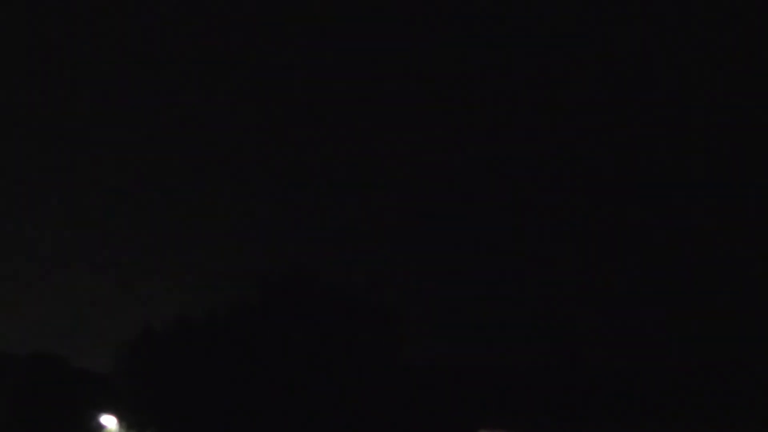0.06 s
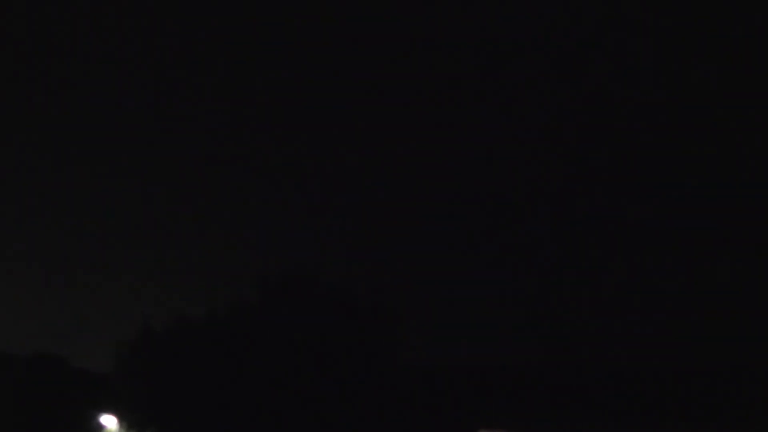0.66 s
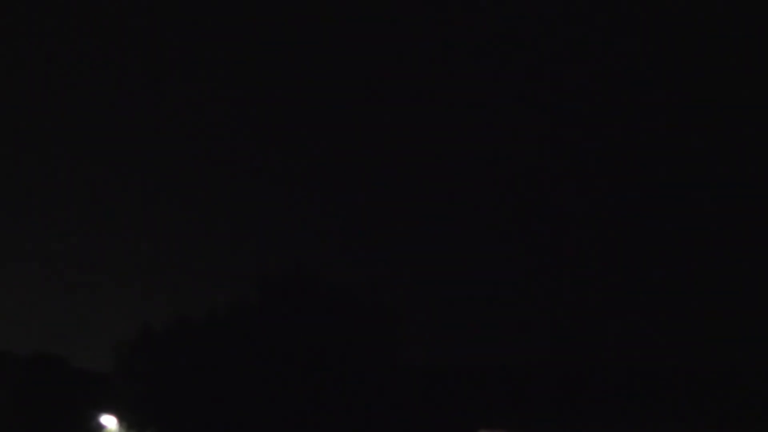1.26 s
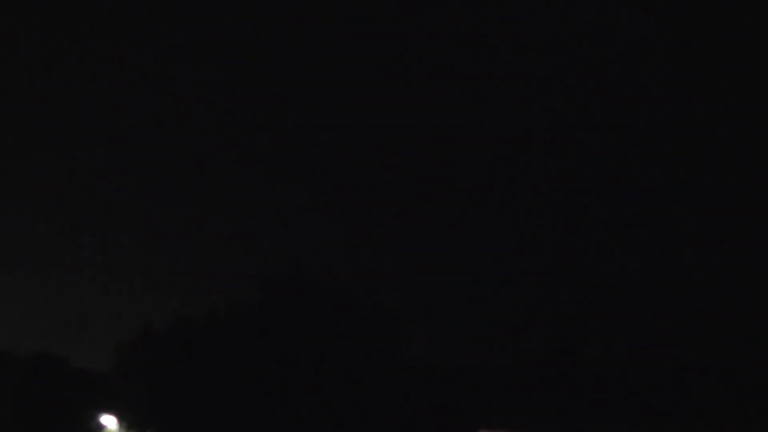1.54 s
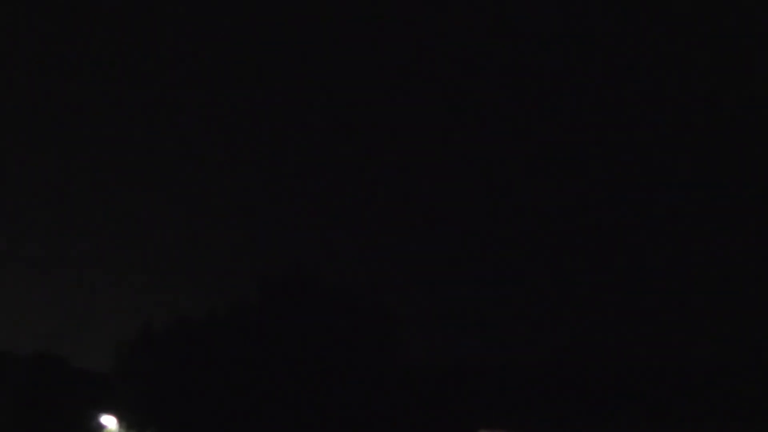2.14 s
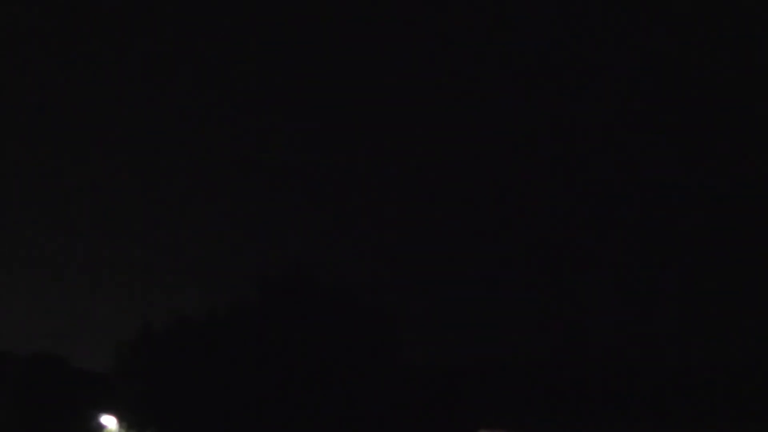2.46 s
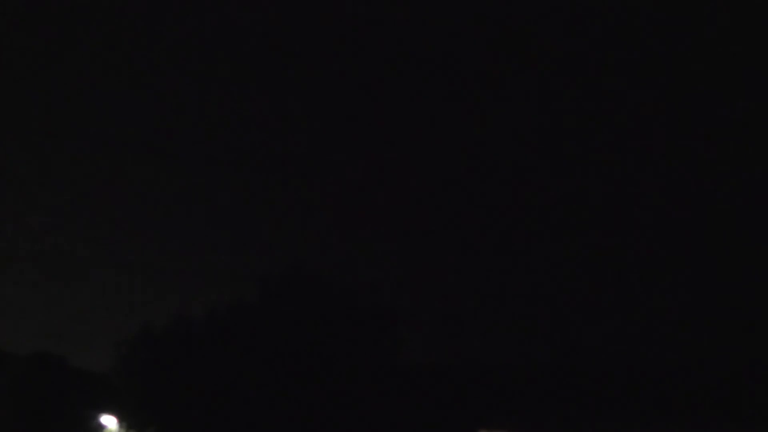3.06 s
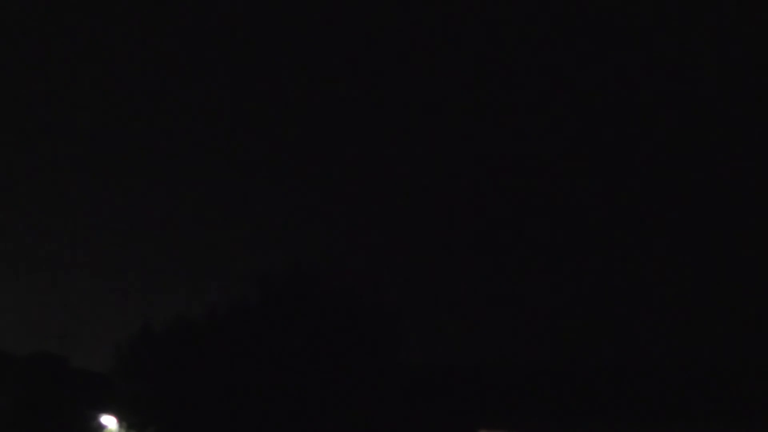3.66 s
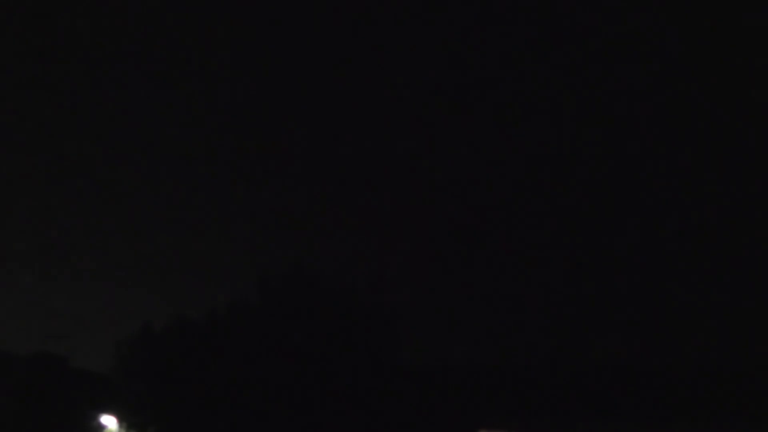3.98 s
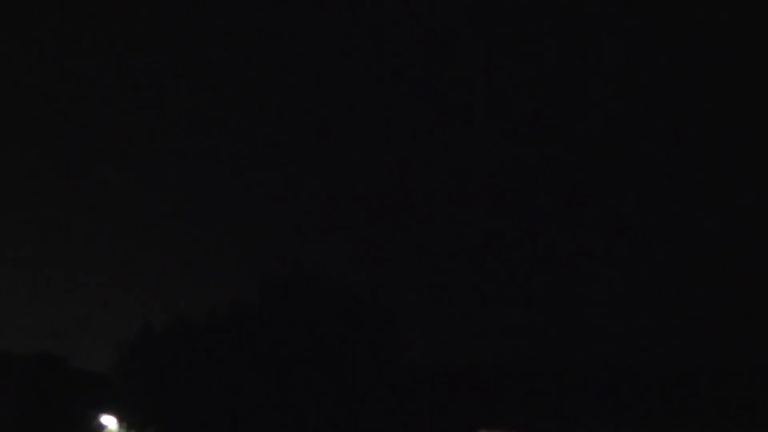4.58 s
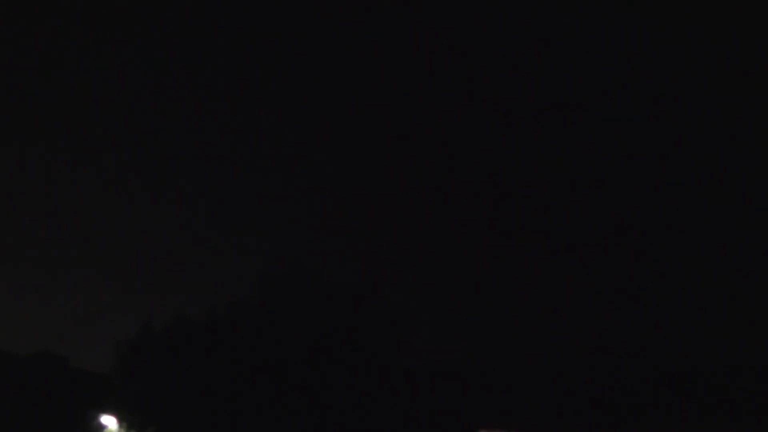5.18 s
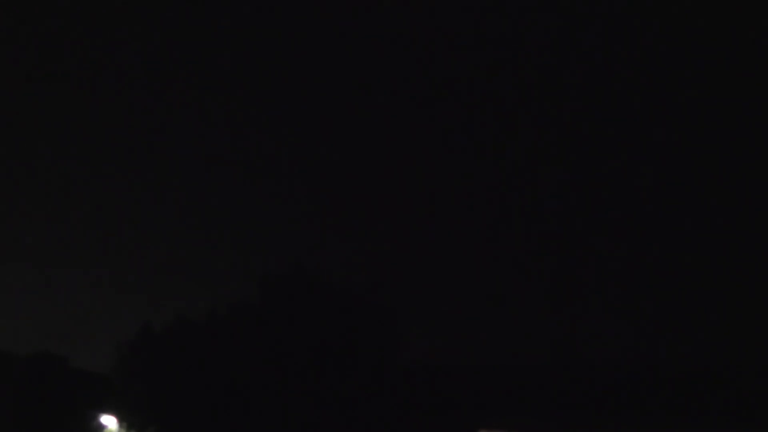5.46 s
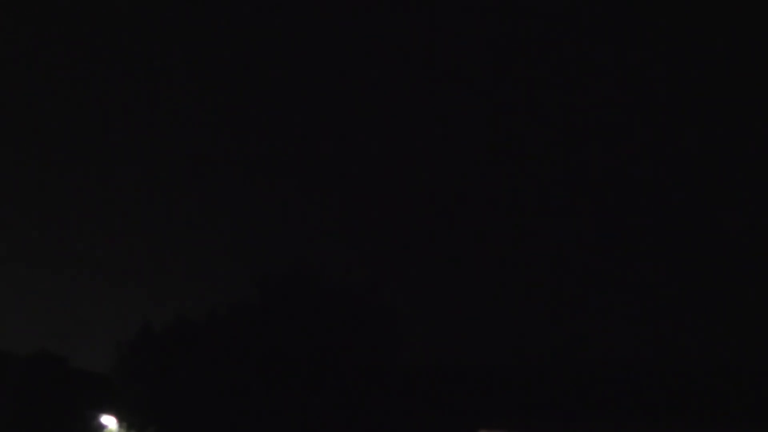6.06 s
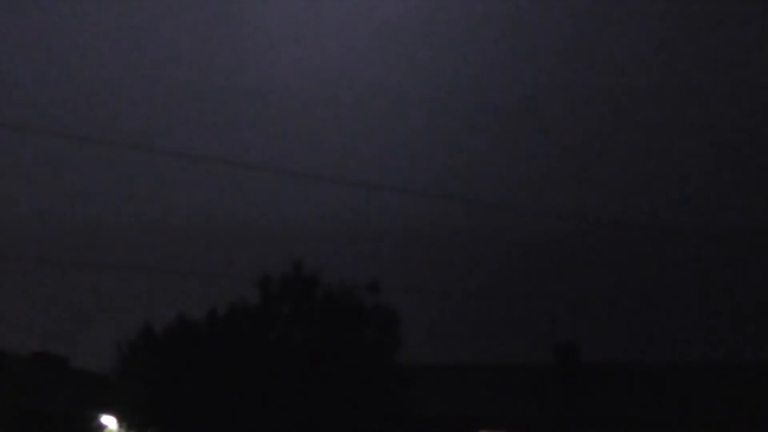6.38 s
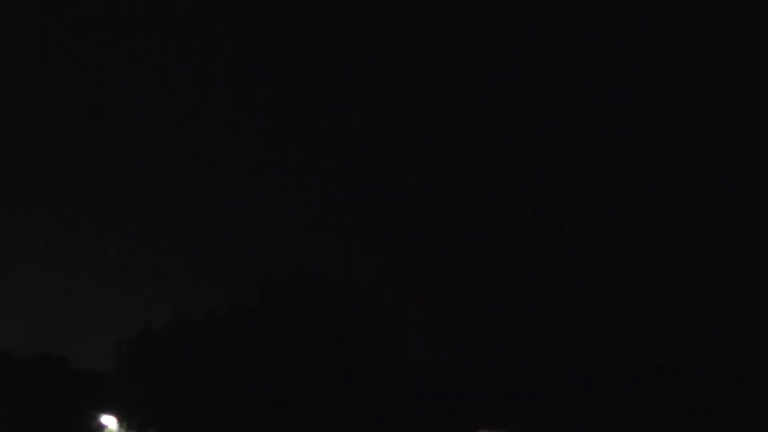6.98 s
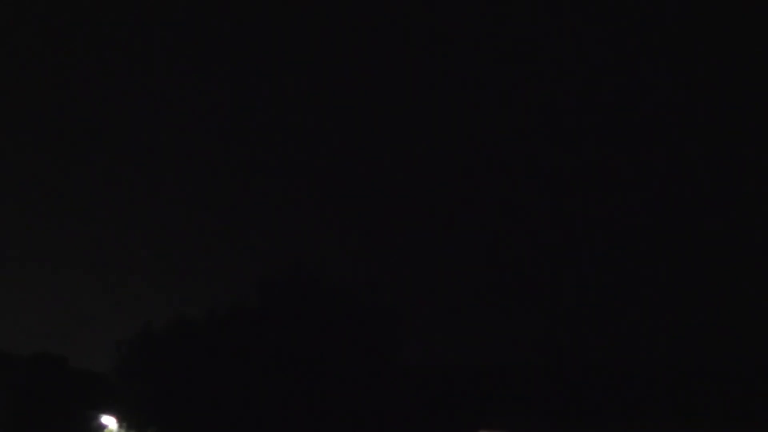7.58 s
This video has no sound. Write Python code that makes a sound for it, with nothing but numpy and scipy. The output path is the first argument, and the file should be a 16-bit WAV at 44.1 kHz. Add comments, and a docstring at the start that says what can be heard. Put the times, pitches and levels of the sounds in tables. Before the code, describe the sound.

A tearing thunder crack opens a long, deep rumble that dips and builds back into booming claps, over a soft sleeve rustle.

```python
"""Thunder on a still night: a tearing crack, then a deep roll that eases and swells again in heavy claps.
Each kink of a long crooked lightning channel sends a shock wave: long waves boom and roll, short ones
tear, steep fronts crackle. Broadside stretches arrive at once as claps. Nearby surfaces colour the thunder.
Close by are a rustling sleeve, tiny squeaks, a stick-slip creak and a faint hiss."""
import sys
import numpy as np
from scipy import signal
from scipy.fft import rfft, irfft, next_fast_len
from scipy.io import wavfile
from scipy.ndimage import uniform_filter1d, minimum_filter1d

SR = 44100
rng = np.random.default_rng(int(sys.argv[2]) if len(sys.argv) > 2 else 0)


def waveform_to_disk(signal):
    """Save audio, clipped to [-1, 1], as 16-bit WAV at the path in sys.argv[1]."""
    frames = np.transpose(np.atleast_2d(signal))
    scaled = np.clip(frames, -1, 1) * 32767
    samples = np.round(scaled).astype(np.int16)
    wavfile.write(sys.argv[1], SR, samples)


N = 345290

# Unbroken roll from the far channel. Each row: time in s, roll level in dB, tearing level in dB.
FAR_ROLL = [(0, -21, -26.5), (.2, -18, -23.5), (.5, -24, -21), (.75, -19.5, -24), (1.0, -19.5, -28.5),
            (1.5, -22.5, -26.5), (1.98, -29, -33.5), (2.41, -28, -32), (2.62, -20, -25.5), (3.33, -18, -29),
            (3.6, -25.5, -31.5), (3.87, -24, -32), (4.17, -16, -23.5), (4.88, -20, -28.5),
            (5.75, -18, -28.5), (5.95, -16, -25), (6.76, -23.5, -31.5), (7.22, -22, -31),
            (7.48, -27, -35.5), (7.83, -25.5, -35)]
# One peal per branch. Each row: start in s, roll level in dB, tearing level in dB, length in s.
PEALS = [(0.221, -16.5, -21, 0.11), (0.341, -19, -16, 0.07), (0.544, -20.5, -17, 0.048),
         (0.615, -14, -30.5, 0.052), (.836, -15.5, -23.5, 0.038), (0.975, -19.5, -26, 0.05),
         (1.16, -23, -34.5, 0.045), (1.303, -22.5, -28.5, 0.093), (1.83, -30.5, -30, 0.072),
         (2.023, -29.5, -28.5, 0.082), (2.125, -27.5, -26.5, 0.11), (2.664, -21.5, -23, 0.051),
         (2.884, -14, -23, 0.059), (3.122, -16, -22.5, 0.068), (3.327, -17.5, -25, 0.051),
         (3.989, -10.5, -21, 0.073), (4.09, -15, -29, 0.12), (4.357, -11.5, -25.5, 0.086),
         (4.547, -17, -32.5, 0.13), (4.739, -18.5, -25, 0.038), (4.905, -9, -22.5, 0.061),
         (4.993, -8.5, -21, 0.055), (5.278, -20, -21, 0.033), (5.365, -13.5, -28, 0.045),
         (5.513, -12.5, -22, .08), (5.979, -8, -19, 0.054), (6.058, -10.5, -19, 0.059),
         (6.262, -22, -26.5, 0.068), (6.532, -17, -30, 0.085), (6.903, -16, -32, 0.045),
         (7.036, -21.5, -32.5, 0.13), (7.267, -15.5, -27.5, 0.041), (7.789, -6, -25.5, .06)]
def peals(attack_s=0.046, t60_s=0.22):
    """Roll and tearing envelopes: each branch's peal adds its power to the unbroken roll."""
    t = np.arange(N) / SR
    power = amp(curves(FAR_ROLL)) ** 2
    for start_s, roll_db, tear_db, length_s in PEALS:
        swell = np.clip((t - start_s) / attack_s, 0, 1)
        fade = amp(-60 * np.maximum(t - start_s - length_s, 0) / t60_s)
        power += np.outer(amp([roll_db, tear_db]), swell * fade) ** 2
    return np.sqrt(power)


# Longest waves, from the main channel. Each row: time in s, gain on the roll envelope in dB.
BOOM_SHARE = [(0, -15.5), (.9, -20.5), (1.4, -10.5), (2.4, -13.5), (3.2, -9.5), (3.8, -9), (4.25, -1),
              (4.45, -5.5), (4.7, -4), (5.0, -10.5), (5.6, -6.5), (7.3, -10.5), (7.8, -15.5)]
# Steep fronts; more air blunts the late ones. Each row: time in s, gain on the tearing envelope in dB.
FRONT_SHARE = [(0, -22), (4.1, -19.5), (5.7, -25), (7.4, -27.5)]
# Shock spectra, longest waves to steepest. Each row: frequency in Hz, relative density in dB.
BOOM_SPECTRUM = [(20, -52.5), (32, -28.5), (43, -12), (68, -17), (85, -7), (105, 5.5), (150, -0.5),
                 (190, -17.5), (400, -65), (1000, -120)]
ROLL_SPECTRUM = [(22, -55.5), (42, -27.5), (72, -31), (100, -12.5), (130, -4.5), (190, 2), (250, -0.5),
                 (345, -3), (400, -19), (520, -27), (900, -56), (2000, -120)]
TEAR_SPECTRUM = [(150, -40), (320, 1.5), (430, -2), (620, 2), (770, -0.5), (880, -4.5), (990, -12.5),
                 (1270, -11), (1500, -28), (2200, -55), (4000, -120)]
FRONT_SPECTRUM = [(700, -53), (1100, -10), (1350, 0.5), (1550, -6.5), (1850, -10.5), (2200, -21.5),
                  (2700, -33), (3600, -46.5), (6000, -64.5), (12000, -100)]
def rumble(boom_db=-0.5, roll_db=-1.84, tear_db=-1.8, steepen_ref_db=-26.5, steepen_db_per_db=0.18):
    """Shocks from the channel's kinks: long ones boom and roll, short ones tear, steep ones crackle."""
    deep, tearing = peals()
    front_share_db, = curves(FRONT_SHARE)
    boom_share_db, = curves(BOOM_SHARE)
    steepness = (tearing / amp(steepen_ref_db)) ** steepen_db_per_db  # strong shocks steepen
    boom = deep * shocks(BOOM_SPECTRUM, rate_hz=600, scatter_db=2.5, steady_s=0.095)
    roll = deep * shocks(ROLL_SPECTRUM, rate_hz=1200, scatter_db=3, steady_s=0.06)
    tear = tearing * shocks(TEAR_SPECTRUM, rate_hz=2800, scatter_db=4, steady_s=0.066)
    fronts = tearing * steepness * shocks(FRONT_SPECTRUM, rate_hz=3000, scatter_db=4.5, steady_s=0.1)
    return (amp(boom_db + boom_share_db) * boom + amp(roll_db) * roll
            + amp(tear_db) * tear + amp(front_share_db) * fronts)


# Single strong shocks. Each row: start in s, relative level in dB.
CLAPS = [(.282, -7.5), (.607, -14), (0.66, -13), (1.351, -14), (2.933, -5.5), (2.988, -10), (3.150, -6),
         (3.173, -9), (3.381, -10.5), (4.028, -5.5), (4.048, -7.5), (4.171, -5), (4.404, -6.5),
         (4.427, -8.5), (4.627, -7.5), (4.944, -4), (4.962, -2.5), (5.039, -6), (5.564, -6), (5.592, -6.5),
         (6.007, -7), (6.113, -2.5), (6.424, -13), (6.581, -11), (7.312, -12)]
# Clap colour. Each row: frequency in Hz, gain in dB.
CLAP_FILTER = [(22, -44.5), (45, -16.5), (70, -16.5), (105, -2), (200, 4.5), (330, -0.5), (420, -8),
               (750, -6), (1000, -17.5), (1350, -20), (2000, -32), (2800, -48.5), (6000, -65.5),
               (14000, -85)]
def claps(echo_db=-9, echo_t60_s=0.15, longest_s=0.006, trim_db=0.5):
    """Broadside stretches of channel arrive at once as an N-wave, then scatter off the land."""
    t = np.arange(SR // 4) / SR
    out = np.zeros((2, N + SR))
    for start_s, level_db in CLAPS:
        length_s = longest_s * amp(level_db) ** 0.35  # stronger shocks stretch longer
        n_wave = (1 - 2 * t / length_s) * (t < length_s)
        paths = amp(-60 * t / echo_t60_s) * rng.standard_normal((2, len(t)))
        paths *= amp(echo_db) / np.linalg.norm(paths[0])
        paths[0, 0] = 1  # direct path
        clap = signal.fftconvolve(paths, n_wave[None], axes=1)
        out[:, round(start_s * SR):][:, :clap.shape[1]] += amp(level_db + trim_db) * clap
    return coloured(out[:, :N], outdoors(CLAP_FILTER))


# Volleys of steep fronts. Each row: centre in s, level in dB, half length in s.
CRACKS = [(0.305, -42.5, 0.05), (0.397, -43, .035), (0.585, -42.5, .025), (2.19, -47, .03),
          (2.947, -38, 0.0147), (3.18, -37.5, 0.0187), (4.046, -33, 0.022), (4.436, -34.5, 0.012),
          (4.968, -34.5, 0.0064), (5.039, -42, 0.0083), (5.321, -44.5, .011), (5.595, -39, .014),
          (6.095, -40, .04)]
# Each row: frequency in Hz, relative density in dB.
CRACK_SPECTRUM = [(300, -20), (700, 5), (1000, 0.5), (1300, 3.5), (1900, -7.5), (2400, -19.5), (3200, -25),
                  (4500, -35), (8000, -52.5), (15000, -69.5)]
def cracks():
    """Where a bend of the channel faces the listener, steep fronts bunch into a short volley."""
    volleys = sum(amp(level_db) * gaussian(centre_s, half_s) for centre_s, level_db, half_s in CRACKS)
    return volleys * shocks(CRACK_SPECTRUM, rate_hz=350, scatter_db=3.5, steady_s=0.03)


# Each row: start in s, level in dB.
OVERLOAD_CLICKS = [(4.038, -49.5), (4.049, -54.5), (4.965, -52)]
def overload_clicks(t60_s=0.018):
    """Thin bright clicks as the microphone briefly overloads on loud claps."""
    t = np.arange(N) / SR
    envelope = sum(amp(level_db - 60 * np.abs(t - start_s) / t60_s) * (t >= start_s)
                   for start_s, level_db in OVERLOAD_CLICKS)
    return envelope * treble_noise()


# Sleeve strokes. Each row: start in s, level in dB, rise in s, T60 in s, airy treble shelf in dB.
SLEEVE_STROKES = [(.222, -54, .012, 0.07, -3), (.455, -48.5, .05, .39, 5.5), (.88, -52, .071, 0.64, 8),
                  (1.035, -49.5, .04, 0.23, 4.5), (1.31, -54.5, .003, .2, -4.5),
                  (1.485, -61.5, .01, 0.4, 2), (1.80, -61, .015, 0.1, 4), (2.573, -49.5, .004, 0.16, -4),
                  (2.611, -52, .01, .56, 1), (2.676, -41, .006, .15, 3), (3.42, -54.5, .005, .17, -9),
                  (3.611, -49.5, .004, .2, -3), (3.662, -51, .005, 0.66, -4.5),
                  (3.715, -48, 0.0086, 0.4, -7), (4.24, -60, .02, .6, 2), (4.517, -48.5, .004, 0.26, -3.5),
                  (4.73, -58, 0.0017, .85, -3.5), (5.533, -58.5, .001, 0.5, 1),
                  (6.621, -62.5, 0.0012, .15, -3.5)]
# Each row: frequency in Hz, relative density in dB.
SLEEVE_SPECTRUM = [(900, -30.5), (2200, -4), (3500, 1), (5500, 1.5), (7500, -3), (10000, -10.5),
                   (13000, -15), (16000, -23.5)]
def sleeve(grain_db=1.5, airy_hz=8500):
    """Cloth rubs in short grainy strokes, some airy, some dull."""
    t = np.arange(SR // 2) / SR
    out = np.zeros((2, N + SR))
    for start_s, level_db, rise_s, t60_s, airy_db in SLEEVE_STROKES:
        def colour_db(hz):
            return along(SLEEVE_SPECTRUM, hz) + airy_db * hz ** 4 / (hz ** 4 + airy_hz ** 4)
        rub = coloured(rng.standard_normal((2, len(t))), colour_db)
        grain = unit(uniform_filter1d(rng.standard_normal(len(t)), size=100))
        stroke = amp(level_db - 60 * t / t60_s) * (1 - np.exp(-t / rise_s))
        out[:, round(start_s * SR):][:, :len(t)] += stroke * unit(amp(grain_db * grain) * rub)
    return out[:, :N]


# Start of each slip in s.
CREAK_SLIPS_S = [7.607, 7.652, 7.696, 7.733, 7.764, 7.795]
# Each row: frequency in Hz, level in dB, T60 in s.
CREAK_MODES = [(563, -28, 0.15), (1530, -42.5, 0.057), (1870, -56, 0.04)]
def creak(rise_s=0.0021, detune=0.036):
    """Something nearby sticks and slips ever faster; each slip rings a few dull modes."""
    t = np.arange(SR // 8) / SR
    out = np.zeros(N + SR)
    for start_s in CREAK_SLIPS_S:
        ring = sum(amp(level_db - 60 * t / t60_s) * np.sin(2 * np.pi * hz * rng.normal(1, detune) * t)
                   for hz, level_db, t60_s in CREAK_MODES)
        out[round(start_s * SR):][:len(t)] += ring * (1 - np.exp(-t / rise_s))
    return out[:N]


# Each row: centre in s, pitch in Hz, level in dB, half length in s.
SQUEAKS = [(3.077, 3830, -70, .09), (3.363, 4050, -57, .005), (4.764, 3730, -61.5, 0.11),
           (5.392, 6230, -59, 0.011), (5.49, 5250, -68, 0.065)]
def squeaks(width_hz=330):
    """Faint narrow bands of noise swell and fade."""
    t = np.arange(N) / SR
    lowpass = signal.butter(2, width_hz / 2, fs=SR, output="sos")
    waver = unit(signal.sosfilt(lowpass, rng.standard_normal(N)))
    tones = sum(amp(level_db) * gaussian(centre_s, half_s) * np.sqrt(2) * np.sin(2 * np.pi * hz * t)
                for centre_s, hz, level_db, half_s in SQUEAKS)
    return waver * tones


# Each row: time in s, relative level in dB.
HISS_LEVELS = [(0.0, -72), (0.62, -66), (1.2, -72.5), (1.75, -69), (2.08, -61.5), (2.55, -66), (3.2, -68),
               (3.9, -63), (4.47, -67), (4.72, -63.5), (5.08, -69.5), (5.49, -65), (6.9, -71), (7.5, -70),
               (7.8, -64)]
def hiss(trim_db=1.0):
    """A faint hiss drifts in level."""
    level_db, = curves(HISS_LEVELS)
    return amp(level_db + trim_db) * treble_noise()


# Hiss and click colour. Each row: frequency in Hz, relative density in dB.
TREBLE_SPECTRUM = [(800, -19), (2500, -4.5), (3600, 1), (5000, 0.5), (6500, -3), (9000, -6), (12000, -8.5),
                   (15500, -14.5)]
def treble_noise():
    """Two independent bright noises of rms 1."""
    return unit(coloured(rng.standard_normal((2, N)), lambda hz: along(TREBLE_SPECTRUM, hz)))


def shocks(spectrum, rate_hz, scatter_db, steady_s):
    """Two hails of shocks of random size and sign, steady in power over spans beyond steady_s."""
    count = int(rate_hz * N / SR)
    arrivals = (rng.random((count, 2)).T * N).astype(int)
    scatter = np.clip(rng.standard_normal((count, 2)).T, -2, 2)
    sizes = amp(scatter_db * scatter) * rng.choice([-1, 1], scatter.shape)
    impulses = np.array([np.bincount(at, size, N) for at, size in zip(arrivals, sizes)])
    hail = coloured(impulses, outdoors(spectrum))
    span = max(int(steady_s * SR), 2)
    power = uniform_filter1d(uniform_filter1d(hail ** 2, span), span)
    return hail / np.sqrt(np.abs(power) + 1e-12)


# Each row: centre in Hz, width in Hz, gain in dB.
SURFACE_BANDS = [(150, 7.4, 7), (164, 23, -3.5), (186.6, 12, 7.5), (207.8, 11, -4), (234.6, 19, 3),
                 (275.1, 14, 6.5), (294.4, 22, -6), (322.8, 26, 5), (514.4, 10, 5), (537, 14, -5),
                 (624.4, 11, 3.5), (748, 34, 5.5), (865, 11, 4.5), (1064, 13, 4.5), (1193, 26, 3)]
def outdoors(spectrum):
    """Gain curve in dB: a spectrum plus the peaks and dips that nearby surfaces add."""
    return lambda hz: along(spectrum, hz) + sum(gain_db / (1 + (2 * (hz - centre_hz) / width_hz) ** 2)
                                                for centre_hz, width_hz, gain_db in SURFACE_BANDS)


# Each row: frequency in Hz, side gain in dB.
STEREO_WIDTH = [(60, -29.5), (125, -26), (250, -21), (700, -15.5), (1300, -10), (2500, -7), (9000, -6.5)]
def stereo(mid_side):
    """Two close microphones: the bass is alike in both, the treble less so."""
    mid, side = mid_side
    side = coloured(side, lambda hz: along(STEREO_WIDTH, hz))
    return np.array([mid + side, mid - side])


def coloured(x, gain_db):
    """Minimum-phase filter with response gain_db(hz)."""
    half = next_fast_len(x.shape[-1] // 2 + SR // 10)
    hz = np.fft.rfftfreq(2 * half, 1 / SR)
    cepstrum = irfft(np.log(amp(gain_db(hz)) + 1e-6))
    cepstrum[1:half] *= 2
    cepstrum[half + 1:] = 0
    return irfft(rfft(x, 2 * half) * np.exp(rfft(cepstrum)))[..., :x.shape[-1]]


def along(points, hz):
    """Interpolate (Hz, value) rows on a log axis."""
    knots_hz, values = np.transpose(points)
    return np.interp(np.log(hz + 1), np.log(knots_hz + 1), values)


def curves(rows):
    """One value per sample for each column after the time."""
    times_s, *columns = np.transpose(rows)
    return [np.interp(np.arange(N) / SR, times_s, column) for column in columns]


def gaussian(centre_s, half_s):
    """Bell envelope, 1/e at half_s from the centre."""
    t = np.arange(N) / SR
    return np.exp(-np.minimum(((t - centre_s) / half_s) ** 2, 50))


def amp(db):
    """Decibels to gain."""
    return 10 ** (np.asarray(db) / 20)


def unit(x):
    """Scale to rms 1."""
    return x / np.sqrt(np.mean(x ** 2) + 1e-20)


def scene():
    """Thunder over small close sounds and a faint hiss."""
    thunder = rumble() + cracks() + claps()
    return stereo(thunder + overload_clicks() + sleeve() + hiss()) + squeaks() + creak()


def record(dry, ceiling=0.96, top_hz=15700):
    """A limiter eases the highest peaks down; everything above top_hz is cut."""
    needed_gain = np.minimum(1, ceiling / (np.abs(dry).max(axis=0) + 1e-9))
    held_gain = minimum_filter1d(needed_gain, size=801)
    gain = uniform_filter1d(uniform_filter1d(held_gain, size=401), size=401)
    n_fft = next_fast_len(N + SR // 2)
    passband = np.fft.rfftfreq(n_fft, 1 / SR) < top_hz
    return irfft(rfft(dry * gain, n_fft) * passband, n_fft)[:, :N]


dry = scene()
out = record(dry)
waveform_to_disk(out)
```